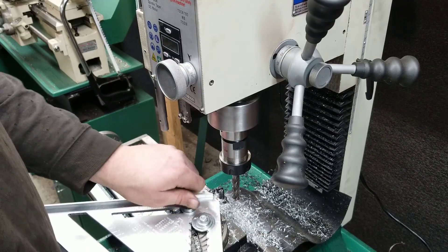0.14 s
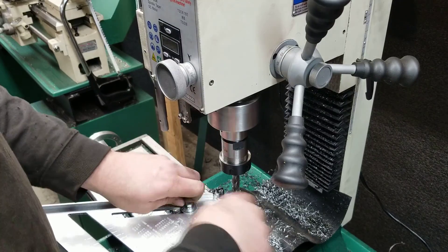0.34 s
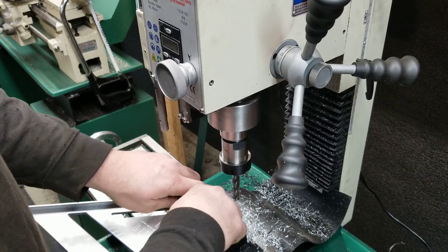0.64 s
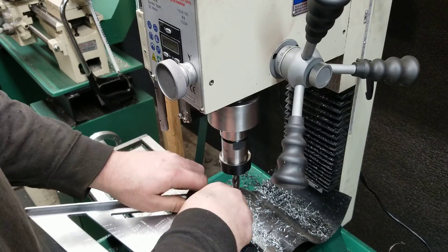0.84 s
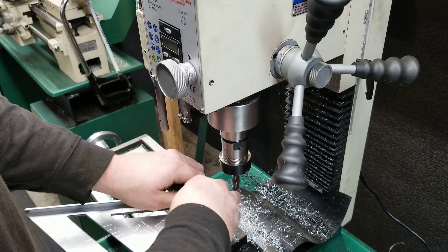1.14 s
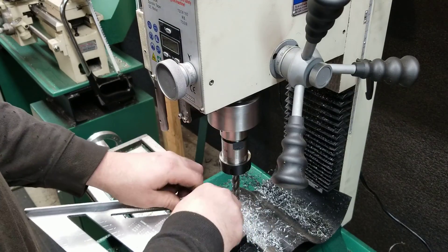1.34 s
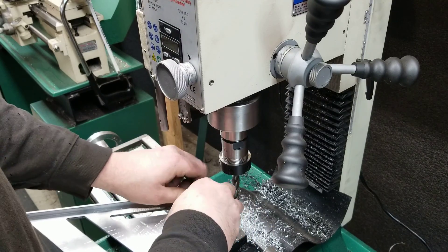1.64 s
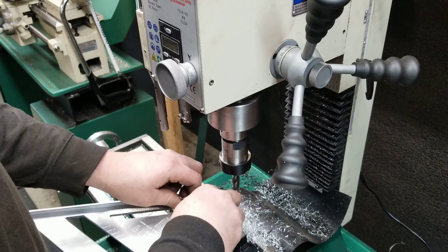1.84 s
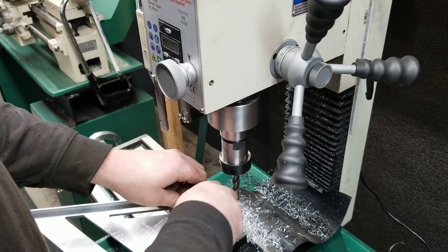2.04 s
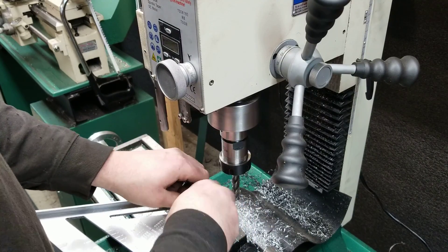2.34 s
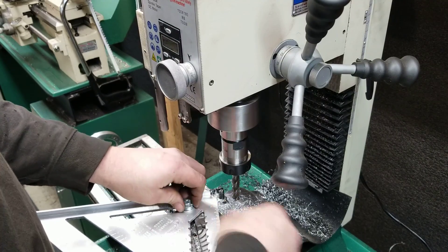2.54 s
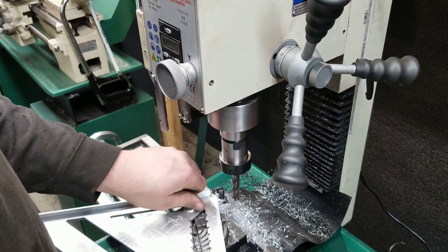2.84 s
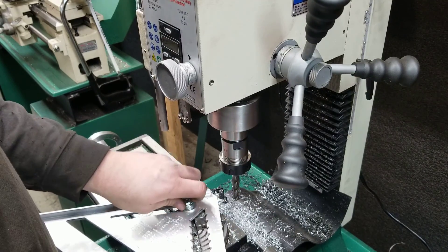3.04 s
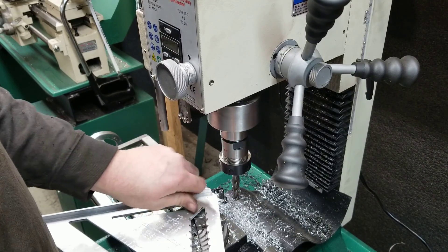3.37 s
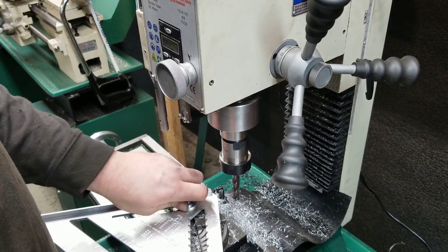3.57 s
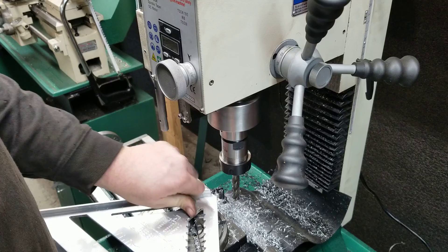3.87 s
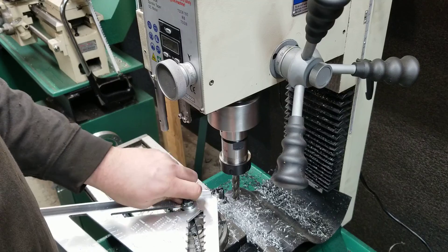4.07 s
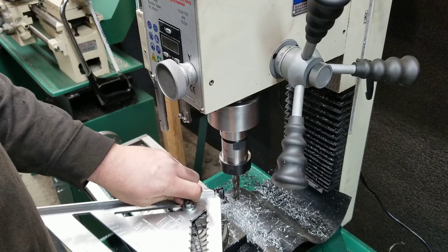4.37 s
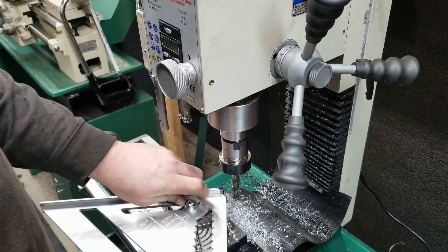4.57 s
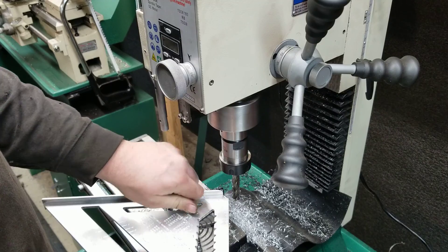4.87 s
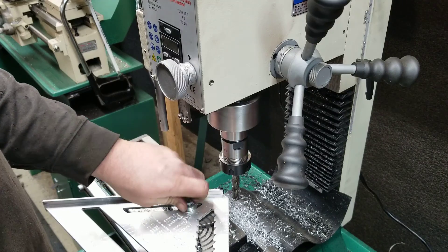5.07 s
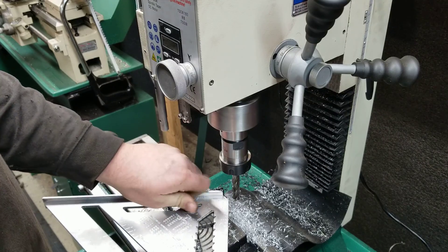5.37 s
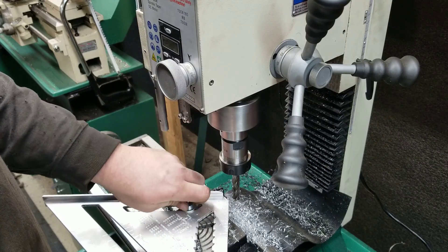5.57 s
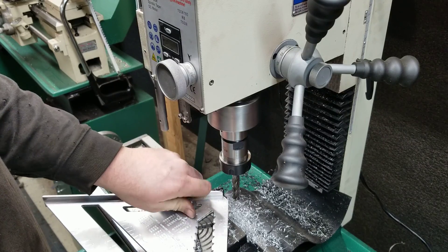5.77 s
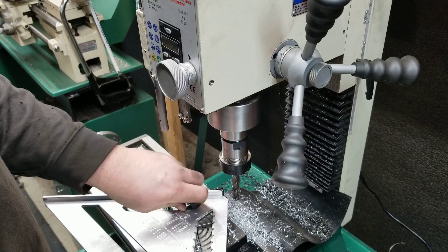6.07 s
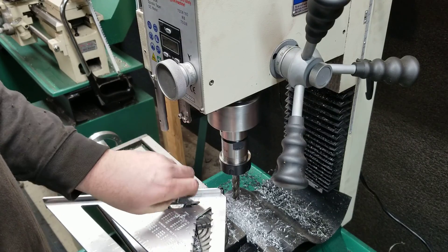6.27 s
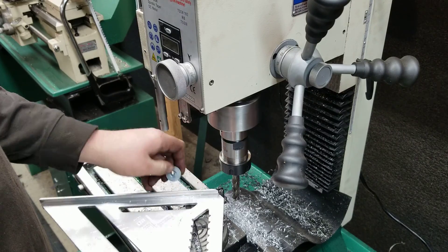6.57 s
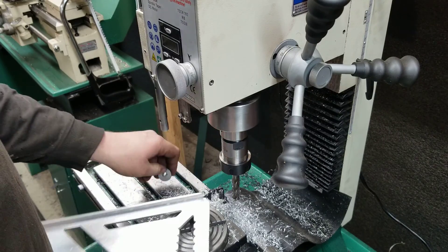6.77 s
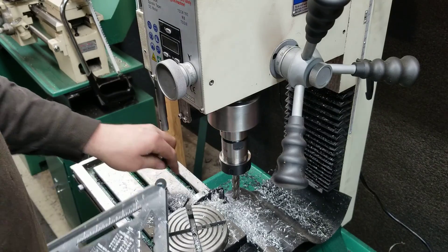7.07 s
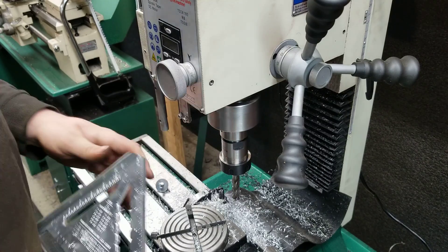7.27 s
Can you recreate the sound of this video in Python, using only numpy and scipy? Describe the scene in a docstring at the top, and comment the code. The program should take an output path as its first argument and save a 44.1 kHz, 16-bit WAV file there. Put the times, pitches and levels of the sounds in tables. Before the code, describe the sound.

Metal clinks, clicks and light scrapes as a clamp is loosened and a metal square is slid off a machine table.

```python
"""Metal clinks, knocks and rasps in a quiet workshop: a wrench is put down, a clamp nut is unscrewed
by hand, a metal square is slid and lifted off a machine table. Hits ring the wrench and the nut as
decaying partials. Knocks ring the square and the clamp bolt and add a short noisy clatter.
Sliding metal rasps in between, its grit ringing the square. The room echoes; the shop rumbles faintly."""
import sys
import numpy as np
from scipy import signal
from scipy.fft import rfft, irfft, next_fast_len
from scipy.io import wavfile

SR = 44100
rng = np.random.default_rng(int(sys.argv[2]) if len(sys.argv) > 2 else 0)


def transcribe(signal):
    """Save signal, clipped to [-1, 1], as a 16-bit WAV file at the path in sys.argv[1]."""
    frames = np.atleast_2d(signal).T
    limited = np.clip(frames, -1, 1)
    pcm = np.round(limited * 32767).astype(np.int16)
    wavfile.write(sys.argv[1], SR, pcm)


N = 326781

# freedom to ring as clamp and hands shift: t/s, square/dB, bolt/dB, ring t60 limit/clatter t60
GRIP = [(0, 0, -4.5, 1.8), (1.001, -3.2, -5, 2.2), (1.7, 0, -6, 2.1), (2.2, -3.5, -28, 2.7),
        (2.37, 3, -11.5, 6.9), (2.8, 1, -6.5, 4), (3.0, -9.5, -19.5, 2.7), (3.4, -5.5, 5.2, 2),
        (4.5, -4.5, 4.6, 1.5), (5.4, -6, -4, 2.5), (5.65, -10, -3.5, 1.8), (5.9, -11.5, 2.4, 1.5),
        (6.3, -0.5, 0, 2.3)]
# metal reaches the two sides unevenly: f/Hz, pan/dB (left minus right)
METAL_PAN = [(60, -0.5), (180, 0.5), (550, 8.5), (1650, 15), (4970, 0), (15000, -4)]


def from_db(db):
    """dB to gain."""
    return 10 ** (np.asarray(db) / 20)


def unit_rms(x):
    """Scale to rms 1."""
    return x / np.sqrt(np.mean(x ** 2) + 1e-20)


def at_hz(points, hz):
    """Interpolate (f/Hz, value) rows over log frequency."""
    points_hz, values = np.transpose(points)
    return np.interp(np.log(hz), np.log(points_hz), values)


def pan(pan_db):
    """Left and right gains, pan_db apart."""
    return from_db(np.array([pan_db / 2, -pan_db / 2]))


def drift(rate_hz):
    """Slow random wander, rms about 1."""
    hop, warmup = 40, 2000
    pole = np.exp(-2 * np.pi * rate_hz * hop / SR)
    white = rng.standard_normal(N // hop + warmup + 2)
    slow = signal.lfilter([1], [1, -2 * pole, pole * pole], white)[warmup:]
    return np.interp(np.arange(N) / hop, np.arange(len(slow)), unit_rms(slow))


def noise_bands(low_hz, correlation_at):
    """Yield (f/Hz, stereo noise) per half octave, with the given left-right correlation."""
    edges_hz = np.geomspace(low_hz, 18000, round(2 * np.log2(18000 / low_hz)) + 1)
    white = rng.standard_normal((2, 2, N))
    for k, (low, high) in enumerate(zip(edges_hz, edges_hz[1:])):
        bandpass = signal.butter(2, [low, high], "band", fs=SR, output="sos")
        mid, side = signal.sosfilt(bandpass, white[k % 2])
        hz = np.sqrt(low * high)
        correlation = np.clip(correlation_at(hz), -1, 1)
        yield hz, np.sqrt(1 + correlation) * mid + np.sqrt(1 - correlation) * side * [[1], [-1]]


def tilt_db(hz, thump_db, low_db, top_db):
    """Contact colour: thump below 1700 Hz, else one-octave ramps either side of 5200 Hz."""
    octaves = np.log2(hz / 5200)
    return thump_db if hz < 1700 else low_db * np.clip(-octaves, 0, 1) + top_db * np.clip(octaves, 0, 1)


def ring(drive, hz, t60_s, contact_hz):
    """One mode; a second resonance, contact_hz wide, softens the onset."""
    w = 2 * np.pi * hz / SR
    r, q = from_db(-60 / (t60_s * SR)), np.exp(-np.pi * contact_hz / SR)
    mode = [0, np.sin(w), 0, 1, -2 * r * np.cos(w), r * r]
    contact = [(1 - q * q) / 2, 0, (q * q - 1) / 2, 1, -2 * q * np.cos(w), q * q]
    return signal.sosfilt([mode, contact], drive + 1e-18)


def knocks():
    """Clamp parts hit the square; each row gains a low/dB after its thump, partly following it."""
    # t/s, level/dB, thump/dB, top/dB, clatter t60/s, pan/dB
    hits = [(0.1005, -34.5, -17, -4.5, 0.096, -8.5), (0.186, -30, -7, 0, 0.12, -15.5),
            (0.2526, -35, -5.5, 10.5, 0.07, -7), (0.615, -49, -13.5, -27, 0.32, -5),
            (0.7032, -31, -12, -8, 0.067, -8), (0.872, -52, -15, -3.5, 0.21, -10),
            (0.9794, -21, -17, -13.5, 0.046, -11), (1.049, -32, -13, -9, 0.073, -1.5),
            (1.1075, -36, -15.5, -29, 0.51, -4), (1.1663, -31.5, -39, -6, 0.11, -8.5),
            (1.3588, -46.5, -23, -30, 0.32, -7), (1.4482, -35, -18, -11, 0.19, -7),
            (1.501, -22.5, -24.5, -12.5, 0.09, -7), (1.5518, -31.5, -37, -16, 0.094, -10),
            (1.636, -31, -26, -9, 0.069, -8), (1.74, -19.5, -20.5, -6, 0.18, -9.5),
            (1.9488, -35, -13, -18, 0.15, 0.5), (2.1411, -40.5, -13.5, -4.5, 0.063, -3),
            (2.1837, -11, -26.5, -11.5, 0.079, -2.5), (2.3144, -26.5, -29, 3.5, 0.079, -3.5),
            (2.351, -21, -51, -11, 0.3, -9), (2.369, -9.5, -34, -10, 0.076, -5),
            (2.611, -37, -30, -24, 0.54, -19), (2.7309, -32.5, -25, -23, 0.19, -6.5),
            (2.8623, -28, -7.5, -5, 0.13, -5), (3.004, -48, -1.5, 0, 0.16, -3),
            (3.055, -23.5, -10, 0.5, 0.049, 1.5), (3.286, -60, 2, -8, 0.078, -1),
            (3.3144, -32.5, -15.5, -14, 0.085, -9), (3.3432, -26, -23.5, -14, 0.076, -14),
            (3.494, -44.5, -1, -8.5, 0.074, -22), (3.6698, -46, -30, -40, 0.54, -14),
            (3.8268, -31.5, -18, -9.5, 0.024, -14.5), (3.894, -37.5, -13, -19, 0.026, -9.5),
            (3.9419, -51, -1, -40, 0.025, -13.5), (4.007, -44.5, -12, -28, 0.075, -8),
            (4.062, -51, -9.5, -22, 0.099, -8), (4.15, -43.5, -35, -7, 0.02, -11),
            (4.2057, -45.5, -4.5, -15, 0.24, -11), (4.3991, -32, -23, -21.5, 0.075, -12),
            (4.4535, -48, -12.5, -17, 0.099, -13.5), (4.646, -30.5, -32, -28.5, 0.099, -7),
            (4.6615, -21.5, -22, -16.5, 0.047, -7), (4.7714, -33, -29, -24, 0.16, -8),
            (4.794, -30.5, -34, -18.5, 0.028, -8), (4.93, -42.5, -30.5, -43, 0.1, -9.5),
            (5.1677, -44.5, -40, -29.5, 0.12, -13), (5.198, -29.5, -35, -28, 0.049, -9.5),
            (5.253, -43.5, -30.5, -29, 0.17, -11), (5.3455, -40.5, -42, -33, 0.04, -11),
            (5.5421, -35.5, -28.5, -16, 0.069, -5.5), (5.578, -33, -41, -27.5, 0.33, -9),
            (5.5936, -28.5, -38, -17, 0.098, -6), (5.6337, -17, -59, -16, 0.12, -9.5),
            (5.6464, -21.5, -45, -9.5, 0.079, -18.5), (5.7563, -37.5, -29.5, -20.5, 0.34, -10),
            (5.8932, -20, -31, -14, 0.075, -21.5), (6.0444, -20, -26, -13.5, 0.04, -15),
            (6.12, -17.5, -37, -20.5, 0.023, -22), (6.176, -44, -51, -33, 0.16, -17),
            (6.2199, -22.5, -54, -14, 0.14, -11), (6.2756, -25.5, -34, -27, 0.032, -11),
            (6.331, -37, -24, -48, 0.07, -10), (6.9032, -62, 10, -8, 0.11, -7.5)]
    return [(at_s, db, thump_db, -3 + 0.22 * thump_db, *rest) for at_s, db, thump_db, *rest in hits]


def knocked_modes(modes, free_db):
    """Each knock drives the modes (f/Hz, level/dB, t60/s) with random scatter; the grip damps them."""
    out, t = np.zeros((2, N + SR)), np.arange(SR // 3) / SR
    hz, mode_db, free_t60_s = np.transpose(modes)
    grip_s, _, _, t60_ratio = np.transpose(GRIP)
    sines = np.sin(2 * np.pi * hz[:, None] * t) * np.minimum(t / 0.0025, 1)
    mode_pan = pan(at_hz(METAL_PAN, hz))
    for at_s, knock_db, thump_db, low_db, top_db, clatter_t60_s, pan_db in knocks():
        # the hand that deadens the clatter deadens the ring
        held_t60_s = max(np.interp(at_s, grip_s, t60_ratio) * clatter_t60_s, .01)
        t60_s = 1 / (1 / free_t60_s + 1 / held_t60_s)
        colour_db = [tilt_db(f, thump_db if f < 1250 else low_db, low_db, top_db) for f in hz]
        scatter_db, pan_scatter_db = 3 * rng.standard_normal((2, len(hz)))
        level_db = knock_db + mode_db - 5 + np.interp(at_s, grip_s, free_db) + colour_db + scatter_db
        gains = from_db(level_db) * pan(pan_db + pan_scatter_db) * mode_pan
        i = int(at_s * SR)
        out[:, i:i + len(t)] += gains @ (from_db(-60 * t / t60_s[:, None]) * sines)
    return out[:, :N]


def square_and_bolt(slide_gain):
    """Knocks ring square and bolt; grit under the slide catches the square's middle modes in turn."""
    # modes of the square on the table, the lowest its thud: f/Hz
    square_hz = [240, 1050, 1170, 1330, 1739, 2150, 2290, 2421, 2520, 2693, 2950, 3770, 3930, 4110, 4479,
                 4650, 4962, 5228, 5539, 5815, 6412, 6682, 7030, 8220, 9860, 11200, 12610, 13590, 14450,
                 14760]
    # same modes: level/dB, t60/s
    square_modes = [(-3, 0.14), (-16.5, .12), (-7, .12), (-9.5, 0.15), (-7.5, 0.33), (-10.5, .14),
                    (-3.5, 0.17), (-10, .16), (-9, .14), (-0.5, 0.28), (-5, 0.37), (-13.5, .15),
                    (-9.5, 0.25), (-9, 0.13), (-7, 0.18), (-9, .12), (-12.5, 0.2), (-10, 0.14),
                    (-9.5, 0.21), (-7, 0.098), (-17.5, 0.24), (-12, 0.16), (-9.5, .1), (-8, 0.3),
                    (-15, 0.13), (-22, .18), (-12.5, .2), (-13, .1), (-12.5, .14), (-4, .13)]
    # loose clamp bolt: f/Hz, level/dB, t60/s
    bolt_modes = [(2090, -6.5, .1), (2310, -6.5, .15), (2540, -6, .12), (3030, -10, .08), (3823, -1.5, 0.2),
                  (3897, -5, .08), (4080, -4, 0.11), (4597, -3.5, .11), (5600, -5, 0.072),
                  (5742, -3.5, 0.066), (7010, -3, 0.084), (8100, -17.5, 0.059), (8630, -8.5, 0.23),
                  (9394, -14.5, .1), (9880, -5, 0.16), (11900, -10.5, 0.11)]
    modes = np.column_stack([square_hz, square_modes])
    _, square_db, bolt_db, _ = np.transpose(GRIP)
    out = knocked_modes(modes, square_db) + knocked_modes(bolt_modes, bolt_db)
    grit = (rng.random(N) < 90 / SR) * rng.standard_normal(N)   # 90 grains/s
    for k, (hz, mode_db, t60_s) in enumerate(modes):
        if 2000 < hz < 8000:
            drive = slide_gain * np.roll(grit, 4001 * k) * from_db(mode_db - 9.5)
            out += ring(drive, hz, 0.71 * t60_s, contact_hz=960) * pan(at_hz(METAL_PAN, hz))[:, None]
    return out


def struck_part(hits, modes_hz, modes):
    """Small solid part: decaying sines; each hit stops the ring before it."""
    out = np.zeros((2, N))
    ends_s = [at_s for at_s, _ in hits[1:]] + [N / SR]
    for k, ((at_s, pan_db), end_s) in enumerate(zip(hits, ends_s)):
        i = int(at_s * SR)
        t = np.arange(int(min(end_s - at_s, .5) * SR)) / SR
        fades = np.minimum(t / .001, 1) * np.minimum((t[-1] - t) / .002, 1)
        for hz, (t60_s, *level_db) in zip(modes_hz, modes):
            partial = from_db(level_db[k] - 60 * t / t60_s) * np.sin(2 * np.pi * hz * t)
            out[:, i:i + len(t)] += pan(pan_db)[:, None] * fades * partial
    return out


def wrench():
    """The wrench rings as it bounces on the table."""
    # bounces: t/s, pan/dB
    bounces = [(.1865, -7), (.2185, -12), (.2525, -8)]
    # modes: f/Hz
    modes_hz = [3450, 5950, 8368, 9025, 9271, 11520, 13190, 13465]
    # same modes: t60/s, level/dB at each bounce
    modes = [(0.1, -23.5, -25, -15), (0.12, -27, -37, -34), (.1, -26, -61.5, -44), (1, -21, -19.5, -50),
             (0.22, -31, -15.5, -19.5), (0.13, -33, -46, -53), (0.13, -42, -36.5, -20), (.1, -33, -43, -44)]
    return struck_part(bounces, modes_hz, modes)


def nut():
    """The loose nut pings when flicked."""
    # flicks: t/s, pan/dB
    flicks = [(1.637, -10), (1.742, -16), (2.866, -15.5), (3.003, -12.5), (3.057, -16.5), (3.285, -13)]
    # modes: f/Hz
    modes_hz = [11630, 11810, 12316, 15100]
    # same modes: t60/s, level/dB at each flick
    modes = [(.22, -53.5, -26, -29, -43.5, -27, -40), (0.055, -45.5, -39, -45.5, -54, -15, -52),
             (0.07, -51, -19, -65, -60, -37.5, -50), (0.15, -47, -47.5, -62, -47, -27, -33)]
    return struck_part(flicks, modes_hz, modes)


def sliding():
    """Metal slides on metal, jolted by trapped chips: returns stereo gain and treble cut/dB."""
    # t/s, length/s, level/dB, top/dB, pan/dB
    strokes = [(0.168, 0.12, -48.5, -5, -7.5), (0.605, 0.11, -49.5, -5, -7), (0.886, 0.1, -49.5, -8, -4.5),
               (0.965, 0.18, -50, -5, -15.5), (1.367, 0.17, -42, -9, -6), (1.557, 0.074, -49.5, 0, -2),
               (1.732, .1, -40.5, -11, -5.5), (1.908, 0.15, -55.5, 0, -7), (2.177, 0.057, -42, -8, -11.5),
               (2.352, 0.077, -39, -17, -11.5), (2.596, 0.15, -47, -3.5, 1), (2.88, 0.14, -53, -6, -9),
               (3.055, 0.27, -44, -3.5, -4), (3.38, 0.38, -51, -1.5, -4.5), (3.847, 0.038, -55, -3, -9),
               (4.053, 0.18, -57.5, -19.5, -9), (4.386, 0.086, -49, -12, -9.5), (4.659, 0.1, -48, -11, -10),
               (4.883, 0.068, -54, -23, -7), (5.103, 0.13, -55.5, -14.5, -8), (5.32, .08, -66, -16, -3.5),
               (5.57, 0.17, -51.5, -4, -12), (5.727, 0.086, -58.5, -8, -4), (5.883, 0.073, -44.5, -3, -7.5),
               (6.049, 0.17, -46.5, 7, -12), (6.276, .1, -58, -5, -10)]
    faint_rub = (0, N / SR, -69, -2.5, -4)
    rise_db_per_s, fall_db_per_s, chips_per_s, chip_t60_s = 605, 145, 120, 0.017
    t = np.arange(0, N + 64, 64) / SR
    start_s, length_s, stroke_db, top_db, pan_db = np.transpose(strokes + [faint_rub])[:, :, None]
    before_s, after_s = np.maximum(start_s - t, 0), np.maximum(t - start_s - length_s, 0)
    power = from_db(stroke_db - rise_db_per_s * before_s - fall_db_per_s * after_s) ** 2
    total = power.sum(axis=0)
    share = power / total   # the loudest stroke sets colour and pan
    curves = np.sqrt(total), (share * top_db).sum(axis=0), (share * pan_db).sum(axis=0)
    level, top_db, pan_db = [np.interp(np.arange(N) / SR, t, curve) for curve in curves]
    chips = (rng.random(N) < chips_per_s / SR) * from_db(3 * np.minimum(rng.exponential(1, N), 4))
    bumps = signal.lfilter([1], [1, -from_db(-60 / (chip_t60_s * SR))], chips)
    gain = level * from_db(0.32 * drift(30)) * unit_rms(0.5 + bumps)
    return gain * pan(pan_db), np.minimum(top_db, 0)


def contact_noise(slide_gain, slide_top_db):
    """Short contacts: a dying clatter after each knock, a rasp under the slide."""
    # knock noise: f/Hz, density/dB
    clatter_spectrum = [(180, 9.5), (700, 11.5), (1250, 14), (1700, 6), (2440, 13), (3300, 13.5),
                        (4400, 1.5), (5660, -7), (7600, 6), (11500, 12), (15000, 2.5), (16500, -5.5)]
    # slide noise: f/Hz, density/dB
    rasp_spectrum = [(150, -44.5), (250, -3.5), (1470, -18.5), (1840, -4.5), (2480, -20), (3410, 1.5),
                     (5660, -22), (7760, -7.5), (12500, -4.5), (15700, -34.5), (16500, -48)]
    out, t = np.zeros((2, N)), np.arange(SR // 6) / SR
    attack = np.minimum(t / 0.0005, 1)
    for hz, noise in noise_bands(183.6, lambda hz: .8):
        rasp_db = at_hz(rasp_spectrum, hz) + 12 + tilt_db(hz, 0, 0, slide_top_db)
        gain = slide_gain * from_db(rasp_db + 0.31 * drift(20))
        for at_s, knock_db, thump_db, low_db, top_db, t60_s, pan_db in knocks():
            i = int(at_s * SR)
            band_t60_s = max(t60_s, .01) * (5000 / hz) ** 0.23   # highs die sooner
            burst = attack * from_db(-60 * t / band_t60_s)
            level_db = knock_db + at_hz(clatter_spectrum, hz) + tilt_db(hz, thump_db, low_db, top_db)
            gain[:, i:i + len(t)] += from_db(level_db) * pan(pan_db)[:, None] * burst[:N - i]
        out += gain * noise * pan(at_hz(METAL_PAN, hz))[:, None]
    return out


def hardware(contacts, direct_gain):
    """Contacts ring clamp, bolt and plate; each resonance reaches each side in its own phase."""
    # broad resonances: f/Hz, width/Hz, level/dB
    resonances = [(1296, 740, -9.5), (2089, 150, -7.5), (2500, 160, -0.46), (2900, 79, -6.5),
                  (3900, 150, -5.5), (4420, 140, -3.9), (4983, 320, -1), (5580, 410, -0.5), (6520, 150, -9),
                  (7000, 120, -9.5), (8580, 130, -9), (9590, 200, -10), (11700, 300, -9.5),
                  (12700, 99, -6.5), (13600, 240, -12), (15000, 400, -12)]
    t = np.arange(int(.1 * SR)) / SR
    hz, width_hz, level_db = np.transpose(resonances)[:, :, None]
    phase = np.pi * np.arange(len(hz))[:, None] + 1.2 * rng.standard_normal((2, len(hz), 1))
    gain = from_db(level_db) * 2 * np.pi * width_hz / SR   # unity peak at 0 dB
    modes = gain * np.exp(-np.pi * width_hz * t) * np.sin(2 * np.pi * hz * t + phase)
    response = modes.sum(axis=1)
    response[:, 0] += direct_gain
    return signal.oaconvolve(contacts, response, axes=1)[:, :N]


def room(x, t60_s, wall_cut_hz):
    """Wall echoes: six feedback delays a side, duller on every round."""
    size = next_fast_len(N + SR)
    hz = np.arange(size // 2 + 1) * SR / size
    wall = 1 / np.sqrt(1 + (hz / wall_cut_hz) ** 2)
    source, out = rfft(x.mean(axis=0), size), []
    for lags_s in rng.uniform(.011, .037, (2, 6)):
        loops = [from_db(-60 * lag / t60_s) * wall * np.exp(-2j * np.pi * hz * lag) for lag in lags_s]
        response = sum((-1) ** k * loop / (1 - loop) for k, loop in enumerate(loops))
        out.append(irfft(source * response, size)[:N])
    return np.array(out)


def shop_rumble(rms_db):
    """Steady workshop rumble and hiss, wavering gently."""
    # f/Hz, relative density/dB
    spectrum = [(12, -32), (20, -4), (131, -2), (212, -7), (244, -8), (372, -15), (465, -29), (709, -23),
                (772, -32), (1280, -24), (1900, -24.5), (3140, -42.5), (13900, -34.5), (15200, -32.5),
                (16500, -54)]
    # f/Hz, left-right correlation
    correlation = [(60, 0.96), (240, 0.9), (950, 0.4), (3770, -0.23), (15000, -0.04)]
    common_db = 1.2 * drift(1.5)
    air = sum(noise * from_db(at_hz(spectrum, hz) + common_db + 1.2 * drift(8))
              for hz, noise in noise_bands(20, lambda hz: at_hz(correlation, hz)))
    return from_db(rms_db) * unit_rms(air)


def scene():
    """Metal parts and their echo over the shop rumble."""
    slide_gain, slide_top_db = sliding()
    metal = square_and_bolt(slide_gain) + wrench() + nut()
    metal += hardware(contact_noise(slide_gain, slide_top_db), direct_gain=.15)
    metal[0] = np.roll(metal[0], 7)   # left lags 7 samples: the parts lie to the right
    echo = from_db(-14.5) * room(metal, t60_s=0.77, wall_cut_hz=2700)
    return metal + echo + shop_rumble(rms_db=-55.5)


def record(dry):
    """Steep low-pass at 16 kHz."""
    return signal.sosfilt(signal.ellip(12, .5, 80, 16000, fs=SR, output="sos"), dry)


dry = scene()
out = record(dry)
transcribe(out)
```